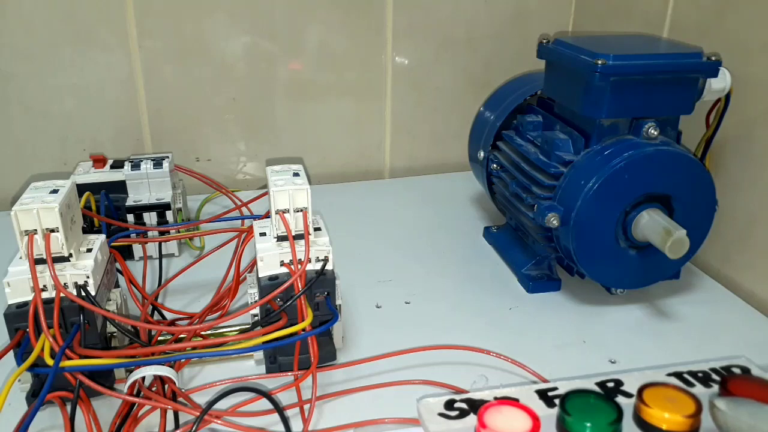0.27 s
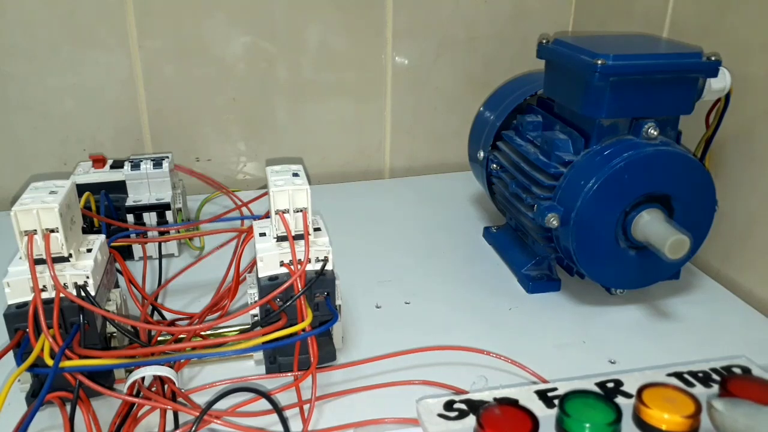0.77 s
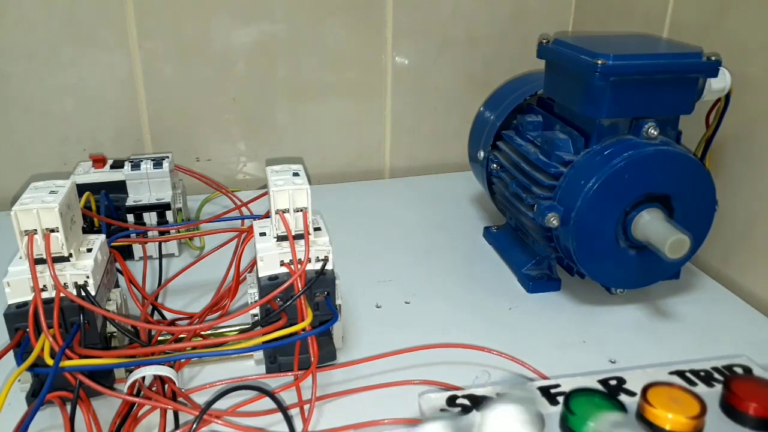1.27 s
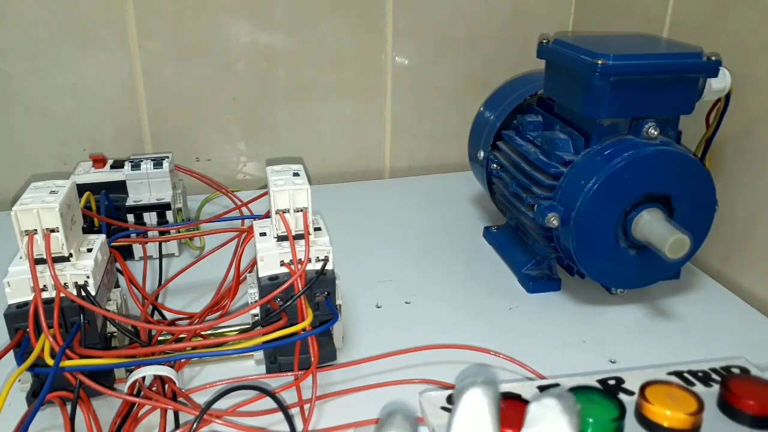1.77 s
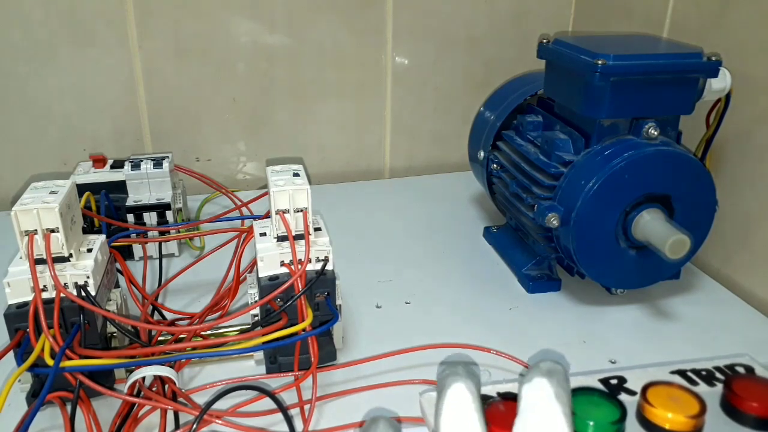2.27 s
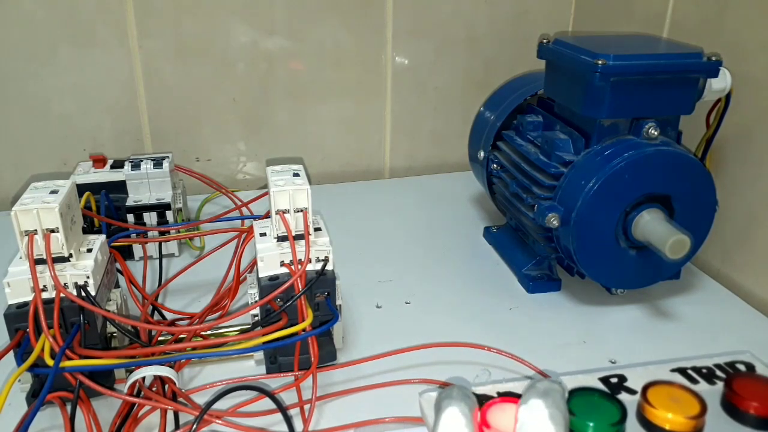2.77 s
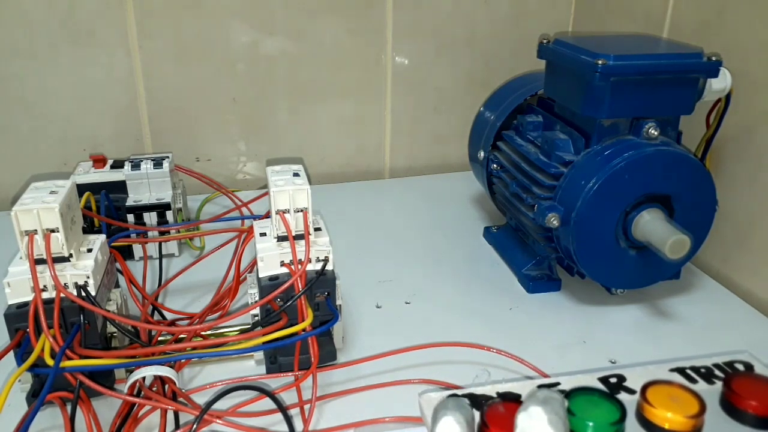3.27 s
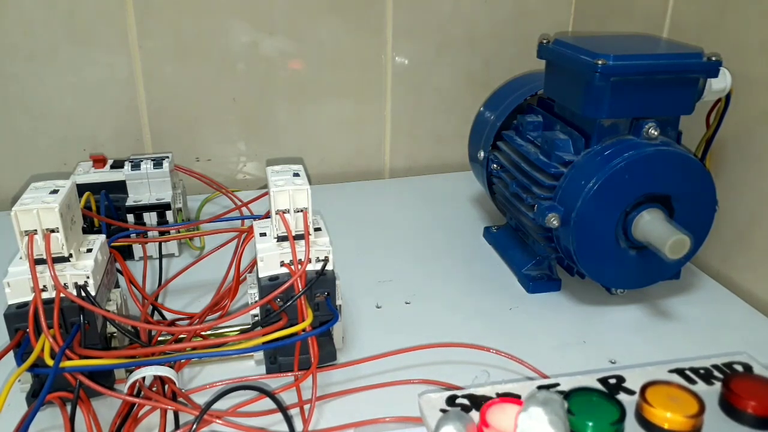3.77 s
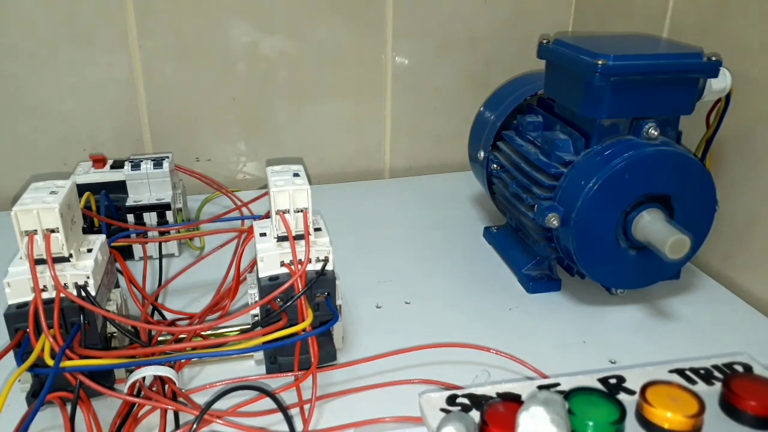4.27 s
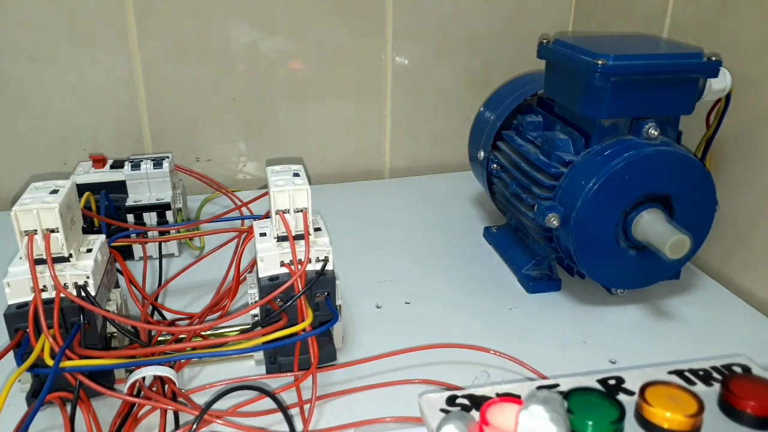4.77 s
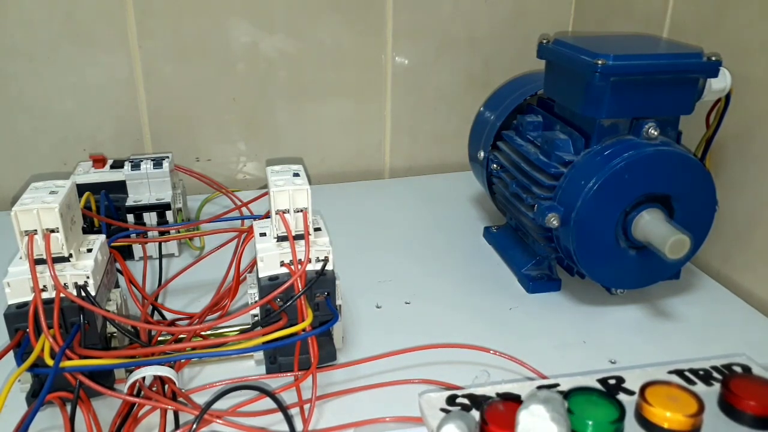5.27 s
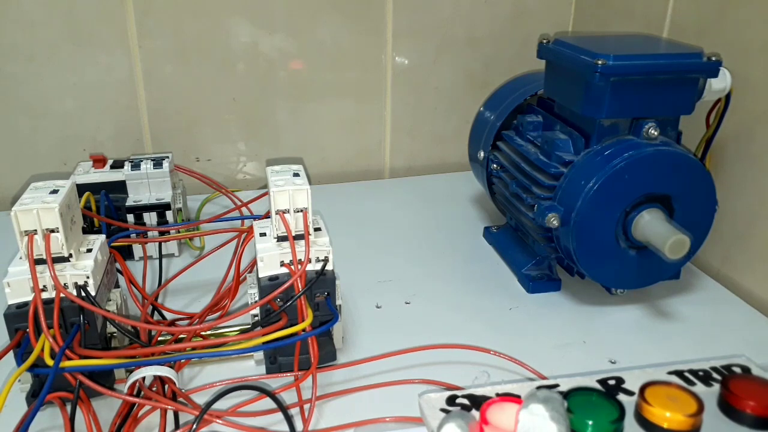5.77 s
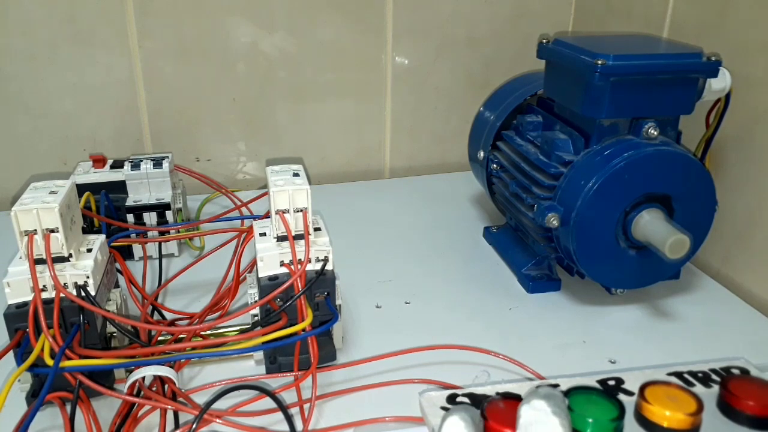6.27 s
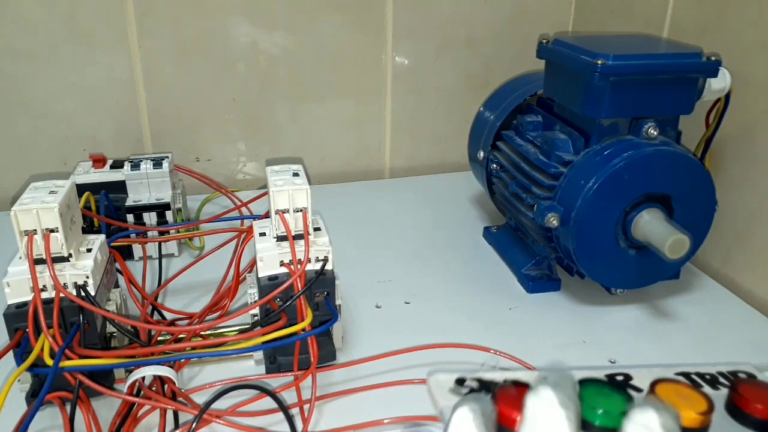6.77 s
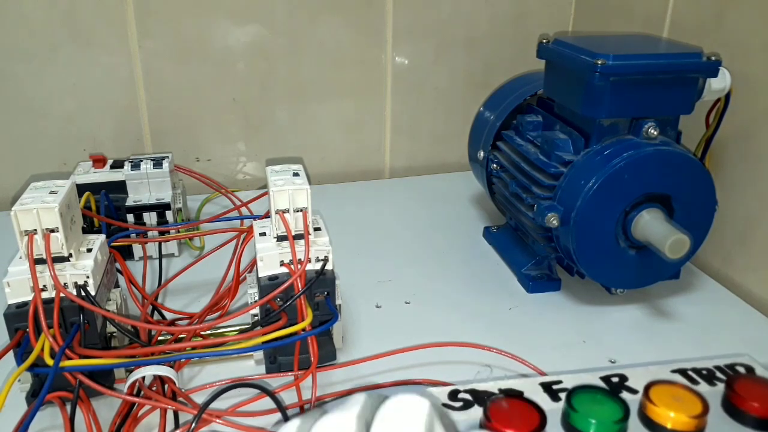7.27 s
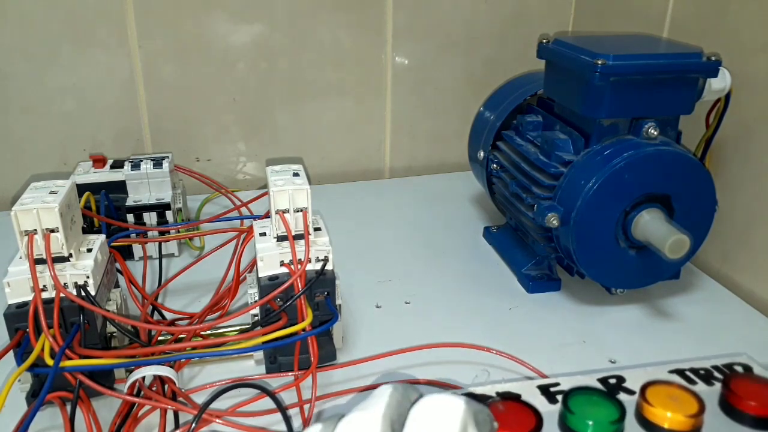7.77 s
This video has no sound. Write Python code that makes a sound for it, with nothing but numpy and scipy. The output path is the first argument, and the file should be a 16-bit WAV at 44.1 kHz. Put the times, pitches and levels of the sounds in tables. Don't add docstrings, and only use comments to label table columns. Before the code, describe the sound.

The sound fades in on quiet room air. At about 0.8 s a contactor slams shut with a bright, ringing metallic crack and the motor jolts twice on the bench, then whines steadily with mid and high tones over airy fan hiss; a faint low hum from a distant machine swells until about 2.3 s. Soft glove ticks and a thin bearing whistle sit underneath. At 2.8 s a fizz and duller knock with springy ringing cut power, and the rotor whirs downward. Slams at 3.2, 4.2 and 5.1 s, each with a double thump, give brief whining jogs ended by knocks at 3.7, 4.6 and 5.6 s. A softer slam at 6.0 s starts the last run; a glove brushes near 6.9 s, buttons tick, and a knock ends it at 7.9 s. Close microphone, small hard-walled space, short dense echoes.

```python
import sys
import numpy as np
from scipy import signal
from scipy.fft import rfft, irfft
from scipy.io import wavfile
from scipy.ndimage import uniform_filter1d

SR = 44100
rng = np.random.default_rng(int(sys.argv[2]) if len(sys.argv) > 2 else 0)


def transcribe(u):
    v = np.clip(np.atleast_2d(u).T, -1, 1)
    q = np.round(v * 32767).astype(np.int16)
    wavfile.write(sys.argv[1], SR, q)


def undo_db(level):
    steps = np.asarray(level, float) / 20
    return 10 ** steps


N = 354078
SHAFT_HZ = 29.85
BLOW_S = 0.6
UNDER_SLAM, UNDER_KNOCK, UNDER_JOLT = 2, 3, 4

# pitch_hz, density_db
ROOM_COLOUR = [(15, -51), (25, -15.5), (32, -19), (97, -7), (121, -13), (159, 2), (177, -22), (288, -4.5),
               (313, -12), (979, -12.5), (1320, -17.5), (14800, -47.5), (16500, -45)]
# pitch_hz, density_db
DRONE_COLOUR = [(60, -31.5), (85, 1), (120, 16), (170, -5.5), (230, -35)]
# start_s, level_db, pitch_hz
FINGER_TICKS = [(0.9074, -36, 5880), (1.051, -37.5, 4100), (1.736, -45, 6570), (2.2194, -38, 5200),
                (6.6238, -42, 5000), (6.6707, -40, 5000), (6.9521, -43, 4700), (7.253, -33.5, 7600),
                (7.3751, -46, 4950), (7.7284, -45, 10800), (7.8341, -43, 8010), (4.44, -49, 10000)]
# pitch_hz, density_db
FAN_COLOUR = [(1940, -37), (3300, -8.5), (4020, -3), (5140, -0.5), (6260, -6), (6730, -10.5), (7290, -1),
              (7690, -13), (8660, -7.5), (9810, -18), (10700, -9.5), (14900, -14), (16000, -21.5)]
# start_s, end_s, pitch_hz, level_db
BEARING_WHISTLES = [
    (1.42, 1.9, 4260, -65.5),
    (6.98, 7.3, 4240, -66),
]
# at_speed_s, off_s, first_whine_db, settled_whine_db, settling_s
POWERED = [
    (.8, 2.82, -45, -45, 1.5),
    (3.27, 3.65, -44, -44.5, .37),
    (4.3, 4.615, -45.5, -45, .3),
    (5.17, 5.555, -44, -44.5, 0.33),
    (6.14, 7.865, -49.5, -45.5, 0.82),
]
SHAFT_ORDERS = [2, 10 / 3, 4, 5, 23, 25, 26, 28, 29, 30, 33, 34, 35]
LONG_ORDERS = [-76.5, -72.5, -63.5, -65.5, -55.5, -50, -47.5, -57, -54, -54.5, -68, -47, -54]
JOG_ORDERS = [-77, -64, -56, -62, -88, -47, -79, -58, -75, -54, -69, -48.5, -48.5]
# pitch_hz, level_db
LONG_TONES = [(1179, -57), (1690, -71.5), (1760, -57.5), (1793, -67.5), (1809, -57.5), (1938, -62),
              (1954, -64.5), (2024, -65.5), (2083, -58.5), (2175, -83), (2449, -73.5), (2611, -66),
              (2670, -63.5), (2794, -72), (2918, -65.5), (2977, -66), (3036, -59.5), (3095, -68),
              (3585, -68)]
# pitch_hz, level_db
SLOT_TONES = [(6363, -70.5), (6390, -78.5), (7079, -75), (7165, -76.5), (10869, -83)]
# pitch_hz, level_db
JOG_TONES = [(1760, -58.5), (1793, -82), (2024, -63), (2078, -56.5), (2853, -65.5), (2977, -64),
             (3036, -61), (3585, -69), (6390, -73), (7079, -69), (7165, -79), (10901, -93)]
# pitch_hz, level_db
COAST_TONES = [(247.6, -58), (538.3, -62), (742.9, -62), (850.6, -60), (2080, -64.5), (3050, -67)]
# pitch_hz, density_db
FED_COLOUR = [(15, -42), (25, -40.5), (48, -34), (123, -23), (532, -10.5), (747, -4), (944, -8), (1030, -3),
              (1380, -9), (1750, -5), (2210, -12.5), (3040, -13), (4000, -27), (5200, -60), (8800, -120)]
# pitch_hz, density_db
COAST_COLOUR = [(15, -31.5), (25, -21.5), (48, -19.5), (188, -8), (248, -4), (468, -8.5), (543, -6.5),
                (716, -6.5), (867, -3), (1350, -10), (2970, -15), (4000, -35), (5200, -59.5), (8800, -120)]
# pitch_hz, t60_s, slam_db, knock_db, jolt_db
BENCH_MODES = [(79, 0.37, -11, -8, -18), (105.6, 0.24, -39.5, -27, -5), (132, 0.22, 3, -7.5, -1.5),
               (157.5, 0.23, -1, 5, -6), (203, 0.17, -10, 0, -7), (249.4, 0.17, -14.5, -3, 1.5),
               (320.8, 0.19, -3.5, -7.5, -10.5), (352, 0.08, -10, -4, 0), (403.7, 0.084, -1.5, -8.5, -3.5),
               (440, 0.058, 1.5, -0.5, -1.5), (529, 0.076, -3.5, -3, -8), (581, 0.02, -5, 1, 2.5),
               (601.3, 0.063, 1.5, 1, -3), (681, 0.091, -9.5, -4, -1), (746.5, 0.11, -6.5, -60, -0.5),
               (839, .1, -3.5, -11, -2), (921.5, 0.032, -7, -20, 8), (1019, 0.12, -3.5, -11.5, -5),
               (1225, 0.098, -10, -3, -17.5), (1320, .04, -15, -23, -23), (1513, 0.034, -8.5, -26, -18)]
# pitch_hz, density_db
TOUCH_TONE = [(1500, -7), (3300, -6), (6000, -9), (15000, -26.5), (16500, -51.5)]
# pitch_hz, density_db
SLAM_TONE = [(410, -30), (700, -19), (1010, -5.5), (1370, -7.5), (1570, -6), (2070, -11.5), (2390, -10.5),
             (3420, -15), (6040, -8.5), (9340, -13.5), (15000, -18), (15900, -31), (16500, -81)]
# pitch_hz, density_db
KNOCK_TONE = [(530, -29), (900, -8.5), (1130, -4.5), (1360, -4.5), (2190, -14), (2410, -8), (3650, -8),
              (4120, -11.5), (8550, -10), (9540, -22), (15200, -22.5), (15900, -27.5), (16500, -71.5)]
# start_s, crack_db, bench_bass_db, bench_mid_db
CORE_SLAMS = [
    (0.767, -2.5, -27, -22.5),
    (3.1609, -1.5, -24, -17.5),
    (4.1842, -1, -25.5, -19),
    (5.0639, -0.5, -18.5, -16.5),
    (6.0279, -4.5, -27.5, -19.5),
]
# start_s, crack_db, bench_bass_db, bench_mid_db, bracket_db
STOP_KNOCKS = [
    (2.825, -8, -24, -11, -18),
    (3.6531, -9, -18.5, -15, -21),
    (4.6202, -9, -20, -13.5, -21.5),
    (5.5618, -8, -21, -13, -20.5),
    (7.869, -8, -18, -14, -41),
]
# start_s, crack_db, bench_bass_db, bench_mid_db
MOTOR_JOLTS = [(.779, -16, -14.5, -14), (.797, -25, -19.5, -15), (3.223, -16, -30, -15),
               (3.258, -16, -17, -9.5), (4.246, -15.5, -10, -12.5), (4.284, -16.5, -21, -8),
               (5.128, -18, -16, -13.5), (5.163, -18, -8.5, -8.5), (6.091, -14.5, -6, -13),
               (6.127, -16, -14, -9.5)]
# pitch_hz, level_db
CORE_TONES = [
    [(4380, -25.5), (5700, -21), (6000, -17), (6300, -19.5), (7500, -26)],
    [(4752, -25), (6670, -21)],
    [(4490, -23.5), (5770, -19), (8030, -21.5)],
    [(2547, -21.5), (4800, -21), (7900, -31)],
    [(4930, -21.5), (5530, -17.5), (6190, -19.5), (8200, -20.5), (10350, -21)],
]
# pitch_hz, over_crack_db, t60_s
SPRING_TONES = [(2440, -33, .2), (2910, -21, .3), (3704, -21.5, 0.4), (5080, -22.5, 0.28),
                (6720, -23, 0.23), (8590, -19, .13)]
# start_s, level_db
MIC_FADE = [(.08, -52), (.15, -12), (.23, -1.5)]


def unit(x):
    return x / np.sqrt(np.mean(x ** 2))


def colour(x, points):
    hz, db = np.transpose(points)
    f = np.arange(len(x) // 2 + 1) * SR / len(x) + 1
    gain = undo_db(np.interp(np.log(f), np.log(hz), db))
    return irfft(rfft(x) * gain, len(x))


def walk(rate_hz):
    k = int(SR / rate_hz)
    held = np.repeat(rng.standard_normal(N // k + 1), k)
    return 1.296 * uniform_filter1d(uniform_filter1d(held, k), k)[:N]


def fall(t, t60):
    return np.exp(-np.log(1000) * t / t60)


def gate(on_s, off_s, slew_s):
    t = np.arange(N) / SR
    return uniform_filter1d(1. * (t > on_s) * (t < off_s), int(slew_s * SR))


def add(out, s, x):
    i = int(s * SR)
    out[i:i + len(x)] += x[:N - i]


def crack(db, points, rise_s, burst_s, tail_db, echo_s=0.0054, t60=0.31, top_t60=0.19):
    t = np.arange(int(BLOW_S * SR)) / SR
    noise = rng.standard_normal((3, len(t)))
    burst = unit(colour(noise[0], points))
    burst = burst * (1 - np.exp(-(t / rise_s) ** 2)) * np.exp(-(t / burst_s) ** 2)
    wall = unit(colour(noise[1], points))
    dull = colour(wall, [(5000, 4.5), (11000, -22.0)])
    patchy = undo_db(2.6 * unit(uniform_filter1d(noise[2], int(.003 * SR))))
    build = 1 - np.exp(-(t / echo_s) ** 2)
    tail = patchy * build * (dull * fall(t, t60) + (wall - dull) * fall(t, top_t60))
    return undo_db(db) * (burst + undo_db(tail_db) * tail)


def bench(column, bass_db, mid_db, push_s, rattle_s, rattle_db):
    t = np.arange(int(BLOW_S * SR)) / SR
    push = t * np.exp(-t / push_s)
    push = push / push.sum()
    grains = rng.standard_normal(len(t)) * (rng.random(len(t)) < 1800 / SR)
    rattle = signal.fftconvolve(grains * np.exp(-t / rattle_s), push)[:len(t)]
    force = undo_db(rattle_db) * rattle - push
    modes = 0
    for row, (level_luck, pitch_luck) in zip(BENCH_MODES, rng.standard_normal((len(BENCH_MODES), 2))):
        hz, t60 = row[:2]
        db = row[column] + (bass_db if hz < 280 else mid_db) + 1.35 * level_luck
        modes = modes + undo_db(db) * fall(t, t60) * np.sin(2 * np.pi * hz * (1 + .012 * pitch_luck) * t)
    return signal.fftconvolve(force, modes)[:len(t)]


def ring(hz, db, t60):
    t = np.arange(int(BLOW_S * SR)) / SR
    noise = uniform_filter1d(rng.standard_normal((2, len(t))), int(t60 ** 2 / 40 * SR) + 40, axis=1)
    shake = unit(noise[0]) + 1j * unit(noise[1])
    strike = (.35 + 4.7 * np.exp(-(t / 0.0031) ** 2)) * (1 - np.exp(-t / 0.00094))
    return undo_db(db) * fall(t, t60) * np.imag((strike + 0.68 * shake) * np.exp(2j * np.pi * hz * t))


def room():
    return unit(colour(rng.standard_normal(N), ROOM_COLOUR)) * undo_db(-59.5 + 1.1 * walk(3.8))


def drone():
    hum = unit(colour(rng.standard_normal(N), DRONE_COLOUR))
    return gate(0.73, 2.3, .3) * undo_db(-57.5) * hum


def rustle():
    t = np.arange(N) / SR
    cloth = unit(colour(rng.standard_normal(N), [(2500, -23), (6000, 2), (14000, -9), (16000, -30)]))
    return undo_db(-60 + 3.5 * walk(70)) * np.exp(-((t - 6.87) / .06) ** 2) * cloth


def fingers():
    out = np.zeros(N)
    for s, db, hz in FINGER_TICKS:
        tone = [(hz / 2, -22), (hz / 1.2, -4), (hz, 0), (hz * 1.3, -7), (hz * 2.5, -16)]
        add(out, s, crack(db - 4, tone, 0.00014, 0.0036, -9.5, t60=0.14, top_t60=0.06))
    return out


def effort():
    t = np.arange(N) / SR
    coast_db, sag_db_per_s = -47, 16
    db = np.full(N, 1. * POWERED[0][2])
    for on, off, first_db, last_db, settle_s in POWERED:
        db = np.where(t > on, np.interp(t, [on, on + settle_s], [first_db, last_db]), db)
        db = np.where(t > off, coast_db - sag_db_per_s * (t - off), db)
    return db


def fan():
    t = np.arange(N) / SR
    hiss = unit(colour(rng.standard_normal(N), FAN_COLOUR))
    return hiss * (t > POWERED[0][0]) * undo_db(0.88 * effort() - 19.0 + .6 * walk(4.8))


def whine(lines, wobble_db, drift):
    out = 0
    for hz, db in lines:
        phase = 2 * np.pi * (hz * np.cumsum(1 + drift * walk(12)) / SR + rng.random())
        level_db = db + wobble_db * (walk(2.886) + 0.52 * walk(14))
        out = out + undo_db(level_db) * np.sqrt(2) * np.sin(phase)
    return out


def whistle():
    out = 0
    for on, off, hz, db in BEARING_WHISTLES:
        out = out + gate(on, off, .08) * whine([(hz, db)], 1.6, .0012)
    return out


def shudder():
    out, t = np.zeros(N), np.arange(SR) / SR
    for on, off, *_ in POWERED:
        for s in on, off:
            add(out, s, (undo_db(-39) * fall(t, 1)) ** 2)
    return out


def whir(points, rumble_db, body_db, upper_db, repeat=0., flicker_db=0.6):
    turn = np.resize(rng.standard_normal(round(SR / SHAFT_HZ)), N)
    noise = colour(rng.standard_normal(N) + repeat * turn, points)
    low = colour(noise, [(400, 1), (560, -44.5)])
    high = colour(noise, [(1150, -45.5), (1500, -1.5)])
    parts = (low, rumble_db), (noise - low - high, body_db), (high, upper_db)
    return sum(unit(x) * undo_db(db + flicker_db * walk(14)) for x, db in parts)


def motor():
    t, db, shake = np.arange(N) / SR, effort(), shudder()
    fed_rumble_db = 10 * np.log10(undo_db(db - 9.5) ** 2 + shake)
    coast_rumble_db = 10 * np.log10(undo_db(db - 10.5) ** 2 + shake)
    spells = [gate(on, off, 0.01) for on, off, *_ in POWERED]
    long = spells[0] + spells[4]
    jog = spells[1] + spells[2] + spells[3]
    order_hz = SHAFT_HZ * np.array(SHAFT_ORDERS)
    steady = whine([*zip(order_hz, LONG_ORDERS), *LONG_TONES, *SLOT_TONES], 1.56, .0014)
    brief = whine([*zip(order_hz, JOG_ORDERS), *JOG_TONES], 1.1, 0.0035)
    fed = undo_db(db + 45.5) * (long * steady + jog * brief)
    fed = fed + (long + jog) * whir(FED_COLOUR, fed_rumble_db, db, db - 7, 0.59)
    coast = undo_db(0.4 * (db + 53.5)) * whine(COAST_TONES, 1.1, 0.0049)
    coast = coast + whir(COAST_COLOUR, coast_rumble_db, db + 1.0, db - 3)
    return fed + (1 - long - jog) * (t > POWERED[0][0]) * coast


def steel():
    out = np.zeros(N)
    for (s, *_), rings in zip(CORE_SLAMS, CORE_TONES):
        for hz, db in rings:
            add(out, s + .0018, ring(hz, db, 0.3 * (hz / 5000) ** -.35))
    luck = rng.standard_normal((len(STOP_KNOCKS), len(SPRING_TONES)))
    for (s, crack_db, *_, bracket_db), chances in zip(STOP_KNOCKS, luck):
        add(out, s, ring(1338, bracket_db, 0.236))
        for (hz, db, t60), chance in zip(SPRING_TONES, chances):
            add(out, s, ring(hz, crack_db + db - 1.2 * chance, t60))
    return out


def jolts(out):
    for s, db, bass_db, mid_db in MOTOR_JOLTS:
        add(out, s, bench(UNDER_JOLT, bass_db - 12.5, mid_db - 8.5, 0.00014, 0.046, -13.0))
        add(out, s, crack(db - 10.5, KNOCK_TONE, 0.00039, 0.0008, -2.4))


def drop_outs(out):
    for s, db, bass_db, mid_db, _ in STOP_KNOCKS:
        add(out, s - .011, bench(UNDER_KNOCK, bass_db - 19, mid_db - 27, 0.00069, 0.0017, 10))
        add(out, s - .011, crack(db - 22, SLAM_TONE, 0.0038, 0.011, -19.0))
        add(out, s - .0065, crack(db - 11.0, SLAM_TONE, 0.00007, 0.0067, 0.5, t60=0.24))
        add(out, s, bench(UNDER_KNOCK, bass_db - 4, mid_db - 6.0, .0001, 0.035, -7.5))
        add(out, s, crack(db - 5.5, KNOCK_TONE, 0.000044, 0.0018, -9.0))


def pull_ins(out):
    for s, db, bass_db, mid_db in CORE_SLAMS:
        add(out, s - .0085, bench(UNDER_SLAM, bass_db + 2, mid_db - 14.5, 0.00036, .005, -17.5))
        add(out, s - .0085, crack(db - 19.5, TOUCH_TONE, 0.00024, 0.0012, -2.0))
        add(out, s - .003, crack(db - 21.5, SLAM_TONE, 0.0022, 0.0094, -36.5))
        add(out, s, bench(UNDER_SLAM, bass_db, mid_db - 5.0, 0.00014, 0.054, -5.5))
        add(out, s, crack(db - 6.5, SLAM_TONE, 0.0015, 0.0046, -7.5, 0.011))


def contactors():
    out = np.zeros(N)
    jolts(out)
    drop_outs(out)
    pull_ins(out)
    return signal.sosfilt(signal.butter(3, 111, "high", fs=SR, output="sos"), out)


def scene():
    background = room() + drone() + rustle() + fingers()
    machine = fan() + whistle() + motor()
    return (background + machine + steel() + contactors())[None]


def top_cut(x):
    return signal.sosfilt(signal.butter(12, 16790, fs=SR, output="sos"), x)


def record(dry):
    fade = undo_db(np.interp(np.arange(N) / SR, *np.transpose(MIC_FADE)))
    heard = np.tanh(0.38 * dry) / 0.42 + undo_db(-75.5) * rng.standard_normal(dry.shape)
    heard = signal.sosfilt(signal.ellip(10, .2, 35, 15550, fs=SR, output="sos"), heard)
    mix = (heard - .0006) * fade
    return top_cut(mix)


dry = scene()
out = record(dry)
transcribe(out)
```